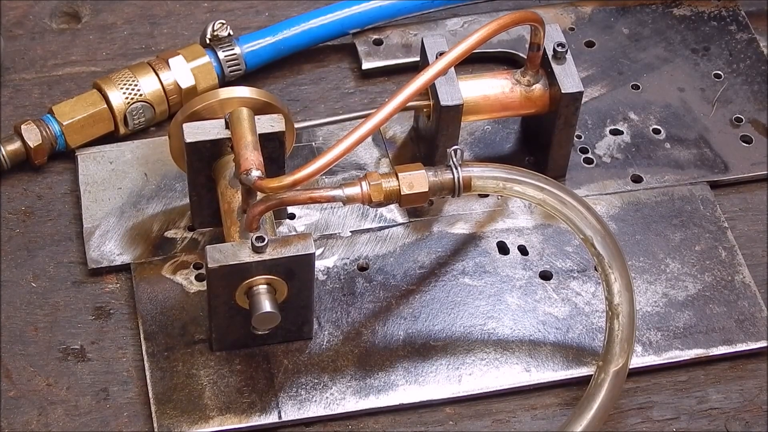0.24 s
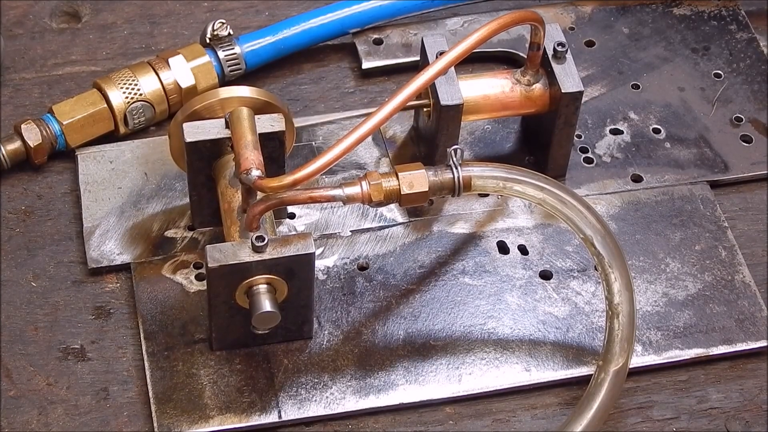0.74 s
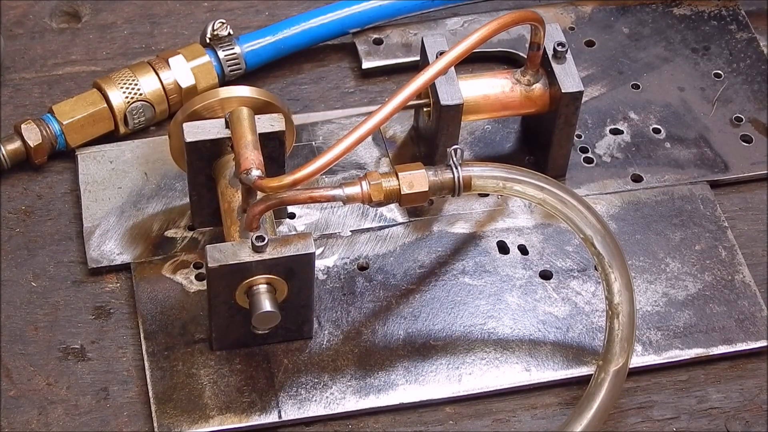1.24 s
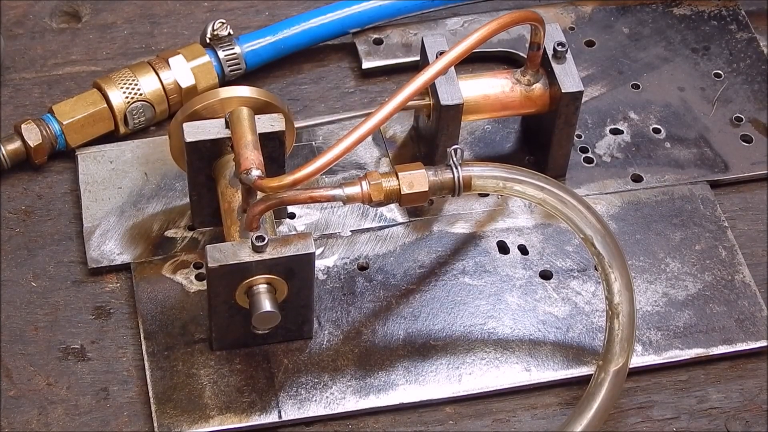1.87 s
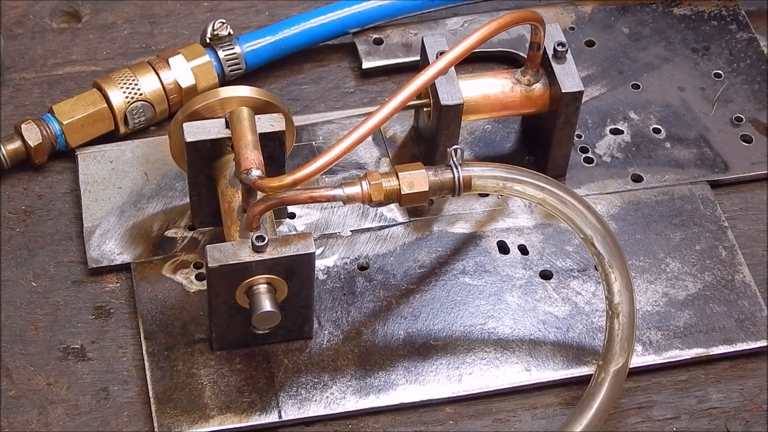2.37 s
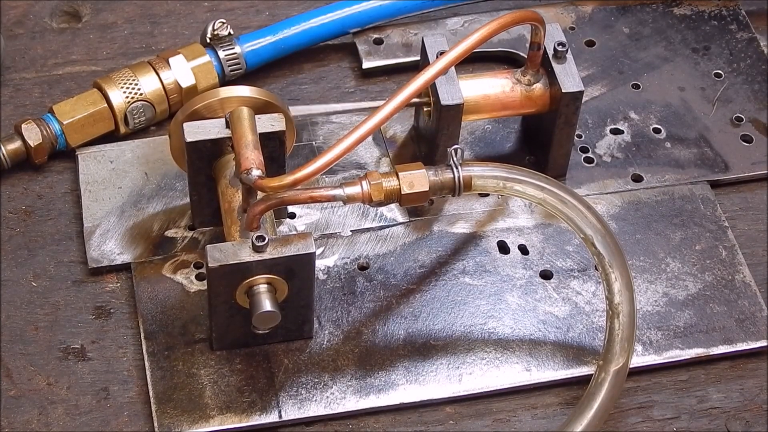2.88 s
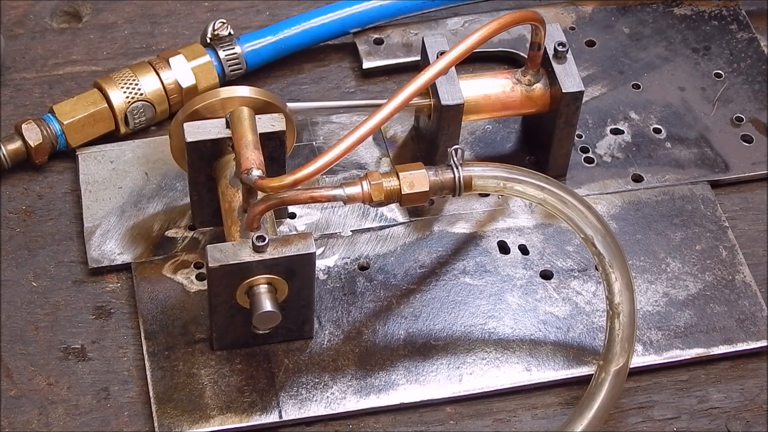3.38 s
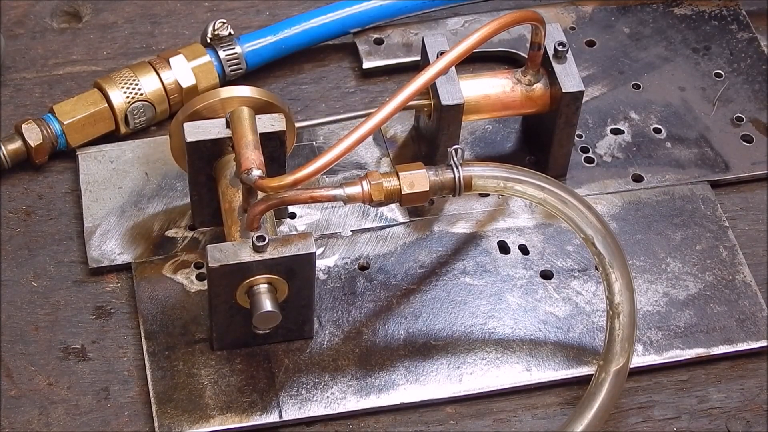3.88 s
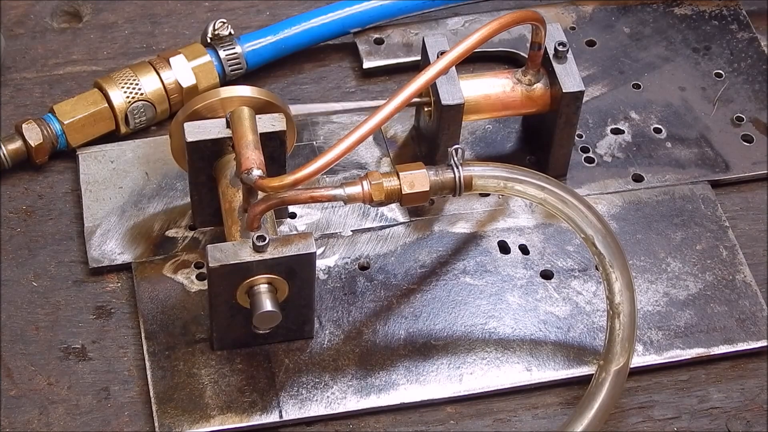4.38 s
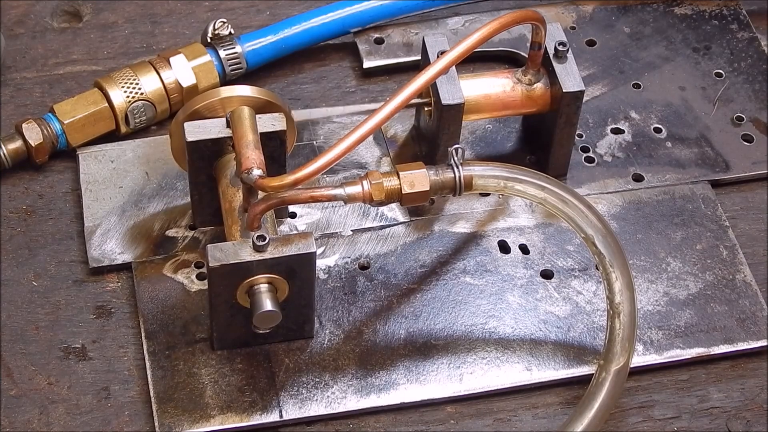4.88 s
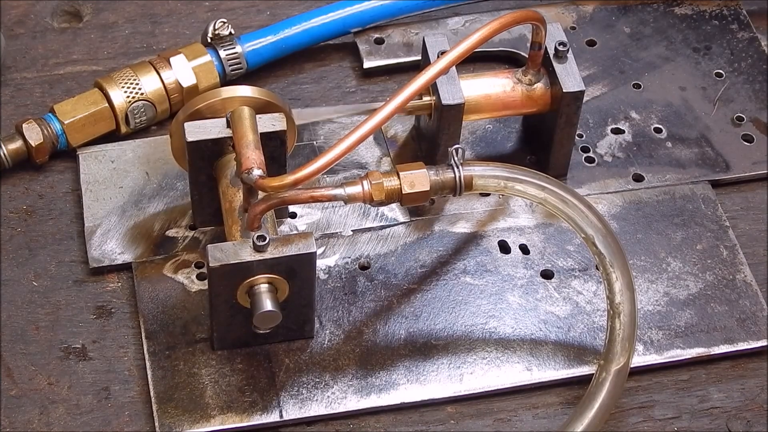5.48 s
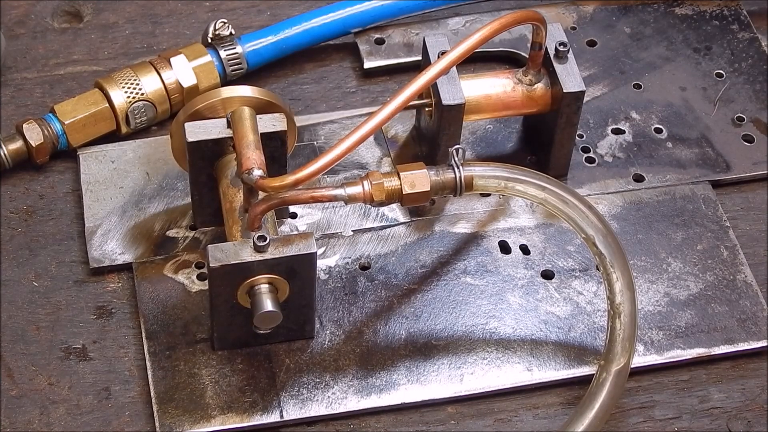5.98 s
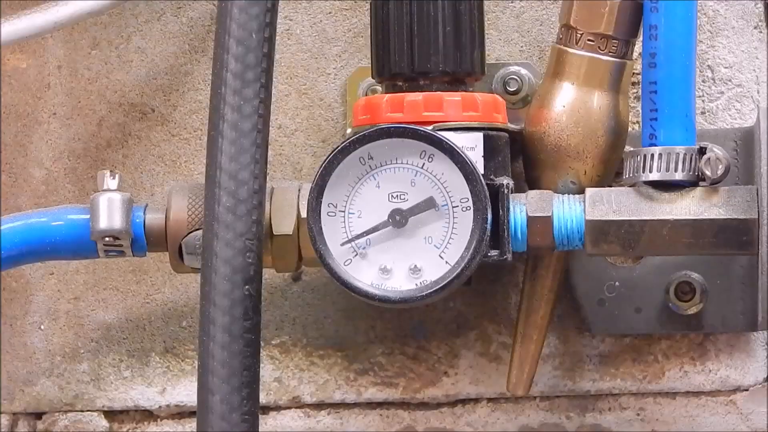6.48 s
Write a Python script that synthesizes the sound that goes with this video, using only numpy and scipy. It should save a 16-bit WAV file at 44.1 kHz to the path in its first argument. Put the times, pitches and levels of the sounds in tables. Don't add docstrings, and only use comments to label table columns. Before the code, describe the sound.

A bench-top model engine is already running: a fast, harsh metallic chatter of pins and rods, harder clacks standing out irregularly, spent air hissing in pulses over a low buzzing plate and bench drone. A dull thump on wood comes past the middle, light taps late. The close, dry, slightly stereo microphone stops briefly, then resumes from further away with fewer bright clicks.

```python
import sys
import numpy as np
from scipy import signal
from scipy.fft import rfft, irfft, next_fast_len
from scipy.io import wavfile
from scipy.ndimage import uniform_filter1d

SR = 44100
rng = np.random.default_rng(int(sys.argv[2]) if len(sys.argv) > 2 else 0)


def digitize_waveform(pressure):
    field = np.atleast_2d(pressure).T
    bounded = np.clip(field, -1, 1)
    quanta = np.round(bounded * 32767).astype(np.int16)
    wavfile.write(sys.argv[1], SR, quanta)


def makeup_ratio(level_db):
    decades = np.asarray(level_db, float) / 20
    return 10 ** decades


N = 296786

# time_s, done_turns
TURNED = [(-0.024, 0), (1.053, 13), (1.949, 24), (3.32, 41), (3.637, 45), (4.104, 51), (4.575, 57),
          (5.197, 65), (5.758, 72), (6.392, 80), (6.556, 82), (6.717, 84)]
# time_s, out_stroke_db, return_stroke_db, bench_db
EFFORT = [(0, 4, 2.5, 5), (0.3, -0.5, 1.5, -1), (0.6, 1, 2.5, 1.5), (1.3, 1.5, 1, 0), (2.2, 1.5, -1, -0.5),
          (2.7, 3, -0.5, 4), (3.4, 2, 0, 0), (3.7, -2, 0, -2), (4.0, 2, 1, 1.5), (4.7, -2, 2.5, -2),
          (5.3, 1, 2.5, -1), (5.75, 1.5, 2.5, 3.5), (6.0, 1, 3.5, -0.5), (6.4, 1.5, 2, 1)]
# time_s, out_stroke_db, return_stroke_db
ODD_STROKES = [(.143, -2.5, -0.5), (.309, -0.5, 3), (.554, 3, -0.5), (.721, 0.5, -1.5), (.885, -1, -1),
               (1.134, -0.5, 1), (1.216, 2, -3), (1.459, 0.5, 1.2), (1.624, -1, -0.5), (1.949, 3, -2.2),
               (2.272, 1, 0.5), (2.434, -0.5, 2.5), (2.515, 1, 1), (2.595, -0.5, 2.5), (2.835, .1, 0.5),
               (2.916, 0, .1), (3.399, -1, 2.5), (3.637, -2.5, 0.5), (3.792, -1, 2), (4.026, -0.5, 1),
               (4.182, -2.5, 1.5), (4.652, 4, 0.5), (4.808, -0.5, -3.5), (4.885, 2.3, -0.5), (5.436, 3, -4),
               (5.676, 0, 0), (5.995, -0.4, -7), (6.074, -1.5, 0.5), (6.233, 0, -2.5), (6.314, -0.5, 0.5)]
# start_s, peak_db, pin_share_db
KNOCKS = [(0.1496, -9.5, -6), (0.3112, -15, -13.5), (0.409, -19, 1.5), (0.7233, -10, -12),
          (1.047, -8, -12.5), (1.4576, -9, -8), (1.7105, -10.5, -17), (1.8736, -14.5, -10),
          (2.0358, -7, -10.5), (2.1071, -9.5, -10.5), (2.1984, -6.5, -19), (2.9138, -5, -9),
          (3.0744, -16, -7.5), (3.1642, -5.5, -14.5), (3.4062, -13, -8), (3.4176, -8, -14.5),
          (3.4855, -15, -3), (3.5648, -5, -10), (3.8003, -10.5, -16), (4.0292, -6.5, -10.5),
          (4.346, -6, -12), (4.5865, -2.5, -14.5), (4.8304, -7.5, -9), (4.9701, -12, -8),
          (5.2145, -11.5, -19), (5.443, -4.5, -13), (5.5218, -10.5, -15), (5.7633, -8.5, -11),
          (6.0008, -7.5, -10), (6.1614, -5, -13.5)]
# turn-to-turn scatter_db, slack-turn change_db, change_db from further away
SCATTER_DB = [1.75, 1.4, 0.7, 1.03, 0.68]
SLACK_DB = [-1.5, -0.5, -1, 0, .1]
FAR_DB = [-12, -9, -22, -6.5, -10.5]
# angle_turns, lasts_ms, timing_scatter_ms, bounce_spread_db
BLOWS = [
    (-.05, 10, 1.2, 2),
    (.085, 3, .5, 2),
    (.205, 2.5, .5, 2),
    (.28, 2.5, .4, 2),
    (.465, 4, .5, 2),
    (.56, 4, .8, 2),
    (.63, 6, .8, 2),
    (.765, 3, .6, 2),
]

# reach_db of each blow in BLOWS, then modes as mode_hz, t60_s, level_db
BENCH = [3.5, 3.5, -0.5, -4, 1, -10, -7.5, -3], [(248, 0.053, -10), (345, 0.11, -1.5), (424, 0.047, 2.5),
         (490, 0.024, -7.5)]
PLATE = [-11, -2.5, -6.5, -6.5, -16, -11, -16.5, -12.5], [(796.4, 0.027, 4.5), (766, 0.081, -26),
         (840, 0.098, -23.5), (950, 0.042, -6), (1176.5, 0.1, -7.5)]
FOOT = [1.5, 4, -22, -37.5, -26, -21.5, -7.5, -8], [(659, 0.054, -1), (561, 0.18, -10)]
ROD = [-7, -7, -4.5, 2.5, 0, -13.5, -38, -16], [(1579, 0.19, -4), (1610, 0.062, 10.5), (1670, 0.03, -23)]
FRAME = [-15, -2.5, -1, -7, -3, 1, -6.5, -4], [(1962, 0.042, -6.5), (2050, 0.081, 3.5), (2147, 0.035, 4),
         (2280, 0.052, 0)]
BRACKET = [-28, -11, -1, 3.5, 3, 1.5, 0, -11.5], [(2619, 0.058, 1), (2760, 0.05, -6.5), (2839, 0.057, 3),
           (2996, 0.0049, 4.5), (3046, 0.054, 2), (3310, 0.037, -6)]
CROSSHEAD = [5.5, 2.5, 3.5, -4, -9, 2, -5.5, -31], [(3694, 0.085, -5.5), (4246, 0.086, -5.5),
             (4480, 0.018, -1.5), (5144, 0.037, 4), (4990, 0.0023, 4.5), (5360, 0.0028, 6),
             (6225, 0.082, -5), (6974, 0.004, 3)]
CRANK_PIN = [3, 1, 0, 2, -5.5, -1, -10, -7.5], [(8420, 0.023, -7.5), (9290, 0.0079, -1.5),
             (9626, 0.0093, 2), (9910, 0.0088, 1.5), (10270, 0.019, -0.5), (11680, .01, -6.5)]
# part, level_db (rms), knock_db
PARTS = [
    (BENCH, -43.5, -16.5),
    (FOOT, -48, -17.5),
    (PLATE, -44, -18.5),
    (ROD, -46, -18),
    (FRAME, -39.5, -5.5),
    (BRACKET, -37.5, -4.5),
    (CROSSHEAD, -36.5, -5),
    (CRANK_PIN, -34.5, -5.5),
]
DRIVEN_BY = [4, 4, 4, 2, 2, 2, 3, 1]
# frequency_hz, level_db
WIDTH = [(60, -4.5), (110, -13), (200, -42), (360, -39), (640, -7), (1160, 1), (2100, -7.5), (3800, 1.5),
         (6880, 1.5), (12400, 2.5)]

# angle_turns, level_db
VALVE = [(-.2, -4), (-.1, -4.5), (-.03, -1.5), (.1, 0), (.3, -.5), (.39, -3), (.5, -2), (.66, -2), (.8, -4)]
# frequency_hz, density_db (per Hz)
AIR_SPECTRUM = [(590, -59), (1000, -16.5), (1330, -15), (2100, -1.5), (2430, -2), (2940, -4), (3910, -6),
                (5090, -6.5), (7450, -9), (9910, -6), (12000, -7), (12500, -11.5), (16200, -54),
                (22000, -120)]
# angle_turns, level_db
ROCK = [(-.2, -14), (-.07, -9), (0, -4), (.11, 0), (.24, -1.5), (.46, -2), (.56, -7), (.63, -16), (.8, -14)]
# time_s, level_db
ROCK_LEVEL = [(0.0, -47), (0.36, -47), (0.49, -46), (2.13, -47.5), (2.64, -44.5), (3.47, -45), (3.6, -49),
              (4.27, -46.5), (4.35, -53.5), (4.67, -43), (4.8, -47.5), (6.43, -46.5), (6.52, -52),
              (6.73, -46)]
# start_s, peak_db, pitch_hz, t60_s
THUDS = [
    (4.214, -16, 252, .04),
    (4.228, -26.5, 210, .06),
    (4.263, -21, 250, .03),
    (5.446, -31, 490, .03),
    (5.449, -32, 1100, .03),
    (5.72, -29, 200, .05),
    (5.766, -28, 230, 0.046),
]
# frequency_hz, density_db
DRONE_SPECTRUM = [(110, -5), (170, -3), (350, -1), (550, -6), (800, -3.5), (1100, -15), (1500, -38.5)]
# frequency_hz, density_db
SHOP_SPECTRUM = [(15, -40), (33, -17), (42, 0), (90, -1), (150, -2), (220, -20)]

# centre_hz, width_hz, share (0 to 1)
BODY_DIPS = [(2455, 150, .75), (7450, 500, .35)]
# start_s, depth_db
DUCKS = [(.158, -4), (2.04, -3), (3.491, -5), (3.575, -1), (4.04, -8.5), (4.987, -8), (5.455, 0),
         (6.009, -0.5), (6.576, 0.5)]
# time_s, gain_db
CUT = [
    (6.43, 0),
    (6.43, -20.5),
    (6.445, -44),
    (6.454, -83),
    (6.457, -140),
    (6.559, -140),
    (6.56, -36),
    (6.566, -6.5),
    (6.576, 2.5),
]

BOUNCES = 4
START, BENCH_DB, RETURN_DB, SLACK = 0, 4, 5, 6


def level(x, db):
    return x * makeup_ratio(db) / np.sqrt(np.mean(x ** 2))


def over_time(table):
    return np.interp(np.arange(N) / SR, *np.transpose(table))


def on_log_hz(hz, table):
    table_hz, db = np.transpose(table)
    return np.interp(np.log(hz + 1), np.log(table_hz + 1), db)


def coloured(table, channels):
    size = next_fast_len(N)
    hz = np.arange(size // 2 + 1) * SR / size
    return irfft(rfft(rng.standard_normal((channels, size))) * makeup_ratio(on_log_hz(hz, table)), size)[:, :N]


def ring(x, hz, t60):
    pole = np.exp(2j * np.pi * hz / SR - np.log(1000) / (t60 * SR))
    return signal.lfilter([1], [1, -pole], x)


def widen(mid, side):
    return np.array([mid + side, mid - side])


def crank(turns):
    start = turns[:, START]
    ends = np.append(start, start[-1] + .08)
    turned = np.interp(np.arange(N) / SR, ends, np.arange(len(start) + 1)) + .2
    return turned % 1 - .2, np.minimum(turned.astype(int), len(start) - 1)


def strokes():
    slack_after_s, far_from_s = .004, 6.5
    mild_lead_s, mild_db, mild_pin_db, mild_spread_db = .003, -23, -13, 3
    when, done = np.transpose(TURNED)
    start = np.interp(np.arange(done[-1] + 1), done, when)

    def nearest(s):
        return np.abs(s[:, None] - start).argmin(axis=1)

    chance = rng.standard_normal((len(start), 8))
    effort, odd, hard = np.array(EFFORT), np.array(ODD_STROKES), np.array(KNOCKS)
    push = np.array([np.interp(start, effort[:, 0], column) for column in effort.T[1:]]).T
    push[nearest(odd[:, 0])] += odd[:, [1, 2, 1]]
    far = start[:, None] > far_from_s
    db = push[:, [0, 0, 0, 2, 1]] + SCATTER_DB * chance[:, :5] + far * np.array(FAR_DB)
    turn = nearest(hard[:, 0])
    late = hard[:, 0] - start[turn]
    slack_turns = turn[(late > slack_after_s) & (late < 3 * slack_after_s)]
    slack = np.isin(np.arange(len(start)), slack_turns)
    db[slack] += SLACK_DB
    mild = np.c_[start - mild_lead_s + .002 * chance[:, 5],
                 mild_db + mild_spread_db * chance[:, 6] + far[:, 0] * FAR_DB[2],
                 mild_pin_db + mild_spread_db * chance[:, 7]]
    return np.c_[start, db, slack], np.r_[hard, np.delete(mild, turn, axis=0)]


def bounces(turns):
    slack_first_db = -7
    start = turns[:, START]
    length = np.clip(np.gradient(start), .07, .09)
    angle, lasts, scatter, spread_db = (c[None, :, None] for c in np.transpose(BLOWS))
    shape = (len(start), len(BLOWS), BOUNCES)
    per_blow = shape[:2] + (1,)
    later = np.arange(BOUNCES) * (.6 + .6 * rng.random(shape)) / BOUNCES
    s = start[:, None, None] + angle * length[:, None, None]
    s = s + (scatter * rng.standard_normal(per_blow) + lasts * later) / 1000
    db = spread_db * rng.standard_normal(shape) + rng.standard_normal(per_blow) - 3.2 * later
    db[:, :, 0] *= .4
    db[:, 0] += slack_first_db * turns[:, SLACK:]
    return np.round(s * SR).astype(int), db


def part(reach_db, modes, column, knock_db, at, size_db, turns, knocks):
    contact_s, contact_cycles = 0.0047, 4.1
    returning = np.array(BLOWS)[:, 0] > .4
    stroke_db = np.where(returning, turns[:, RETURN_DB:RETURN_DB + 1], turns[:, column:column + 1])
    size_db = size_db + (stroke_db + np.array(reach_db))[:, :, None]
    pin_db = knocks[:, 2] - knocks[:, 2].mean()
    hard_db = knocks[:, 1] + 16 + knock_db + (pin_db if column == 1 else -.4 * pin_db)
    first = np.append(np.arange(at.size) % BOUNCES == 0, np.ones(len(knocks), bool))
    at = np.append(at, np.round(knocks[:, 0] * SR).astype(int))
    size = makeup_ratio(np.append(size_db, hard_db + 6.5))
    inside, out = (at >= 0) & (at < N), 0
    for k, (hz, t60, db) in enumerate(modes):
        loose = np.clip((hz - 1400) / 700, .12, 1)
        flipped = rng.random(at.shape) < loose ** 2 / 2
        spot = np.where(flipped, -1, 1) * np.where(first, 1, loose)
        spot = spot * makeup_ratio(2 * loose * rng.standard_normal(at.shape))
        hits = np.bincount(at[inside], (size * spot)[inside], N)
        push = ring(hits, hz, max(contact_s, contact_cycles / hz))
        z = ring(push, hz, t60) / np.sqrt(t60)
        side = (-1) ** k * 0.38 * makeup_ratio(on_log_hz(hz, WIDTH)) * z.real
        out = out + makeup_ratio(db) * widen(z.imag, side)
    return out


def air(turns):
    hush_db, slack_ends_turns = -2, 0.089
    drive_db = turns[:, [1, 2, 3, RETURN_DB]].mean(axis=1)
    push_db = np.interp(np.arange(N) / SR, turns[:, START] + 0.013, drive_db)
    steps = np.repeat(rng.standard_normal(N // 90 + 1), 90)
    flutter_db = uniform_filter1d(steps, size=90)[:N]
    angle, turn = crank(turns)
    held_db = uniform_filter1d(hush_db * turns[turn, SLACK] * (angle < slack_ends_turns), size=130)
    valve_db = np.interp(angle, *np.transpose(VALVE))
    gain = makeup_ratio(valve_db + held_db + 0.74 * push_db + flutter_db)
    side_spectrum = [(hz, db + on_log_hz(hz, WIDTH) - 2.5) for hz, db in AIR_SPECTRUM]
    mid = coloured(AIR_SPECTRUM, channels=1)[0]
    side = coloured(side_spectrum, channels=1)[0]
    return level(gain * widen(mid, side), -31)


def rocking(turns):
    first_hz, second_hz, second_lag_turns = 199, 345.3, .18
    angle, turn = crank(turns)
    t = np.arange(N) / SR
    start, push_db = turns[turn][:, [START, BENCH_DB]].T
    detune = 1 + 0.015 * rng.standard_normal(len(turns))[turn]

    def swing(hz, lag):
        swell_db = np.interp((angle - lag + .2) % 1 - .2, *np.transpose(ROCK))
        return np.sin(2 * np.pi * hz * detune * (t - start)) * makeup_ratio(swell_db)

    first = level(swing(first_hz, 0) * makeup_ratio(.3 * push_db), 0)
    second = level(swing(second_hz, second_lag_turns) * makeup_ratio(.6 * push_db), -53)
    return first * makeup_ratio(over_time(ROCK_LEVEL)) + second


def thuds():
    out = np.zeros(N)
    for s, db, hz, t60 in THUDS:
        blow = 1. * (np.arange(N) == int(s * SR))
        out -= makeup_ratio(db) * ring(blow, hz, t60).imag
    return out


def bench_drone(turns):
    mid, side = coloured(DRONE_SPECTRUM, channels=2)
    load_db = over_time(turns[:, [START, BENCH_DB]])
    load_db = load_db + 3 * np.interp(crank(turns)[0], *np.transpose(VALVE))
    return level(makeup_ratio(load_db / 2) * widen(mid, 0.28 * side), -43)


def room(x, t60, wet_db):
    t = np.arange(int(.4 * SR)) / SR
    tail = rng.standard_normal((2, len(t))) * 1000 ** (-t / t60) * (t > .002)
    tail = signal.lfilter([1], [1, -.3], tail)
    tail = tail / np.sqrt(np.sum(tail[0] ** 2))
    return makeup_ratio(wet_db) * signal.fftconvolve(x, tail, axes=1)[:, :N]


def workshop():
    mid, side = coloured(SHOP_SPECTRUM, channels=2)
    return level(widen(mid, .36 * side), -52)


def ducking():
    drop_s, recover_s = 0.015, 0.17
    start, depth_db = np.transpose(DUCKS)[:, :, None]
    since = np.clip(np.arange(N) / SR - start, 0, None)
    return np.sum(depth_db * np.minimum(since / drop_s, 1) * np.exp(-since / recover_s), axis=0)


def scene():
    turns, knocks = strokes()
    at, size_db = bounces(turns)
    engine = thuds()
    for (body, db, knock_db), column in zip(PARTS, DRIVEN_BY):
        engine = engine + level(part(*body, column, knock_db, at, size_db, turns, knocks), db)
    near = engine + room(engine, t60=0.12, wet_db=-11) + air(turns)
    near = signal.sosfilt(signal.butter(N=3, Wn=140, btype="high", fs=SR, output="sos"), near)
    return near + rocking(turns) + bench_drone(turns) + workshop()


def top_cut(x):
    return signal.sosfilt(signal.butter(12, 13040, fs=SR, output="sos"), x)


def record(dry):
    for hz, width, share in BODY_DIPS:
        dry = dry - share * signal.lfilter(*signal.iirpeak(hz, hz / width, SR), dry)
    x = np.tanh(4 * dry) / 4
    x = signal.sosfilt(signal.cheby1(N=14, rp=.3, Wn=11880, fs=SR, output="sos"), x)
    x = x * makeup_ratio(over_time(CUT) + ducking())
    return top_cut(x)


dry = scene()
out = record(dry)
digitize_waveform(out)
```